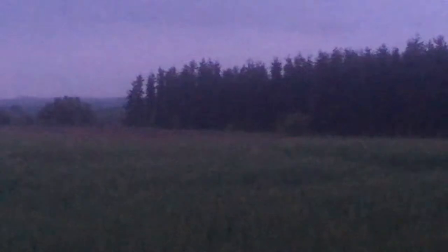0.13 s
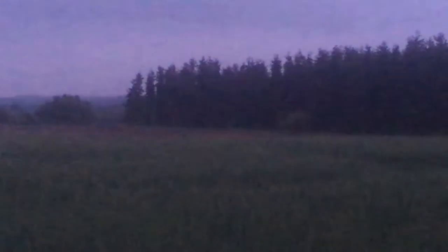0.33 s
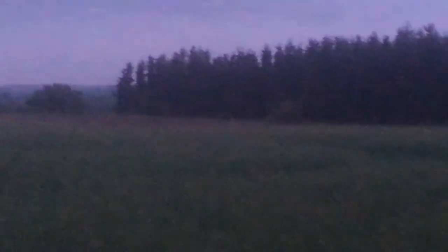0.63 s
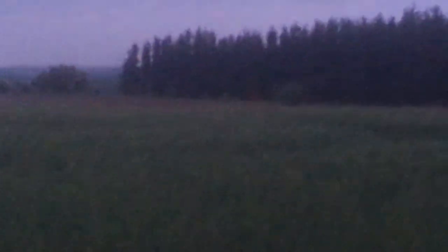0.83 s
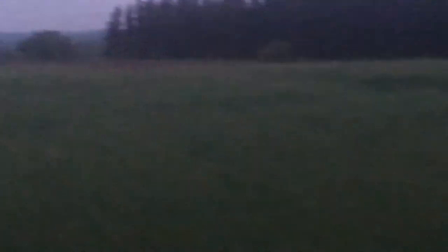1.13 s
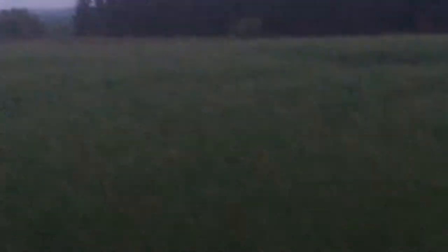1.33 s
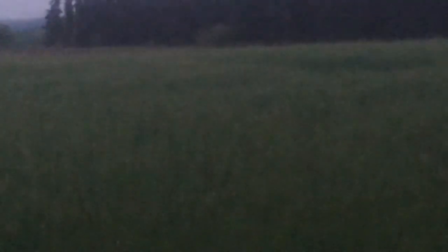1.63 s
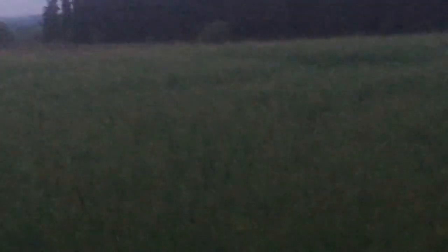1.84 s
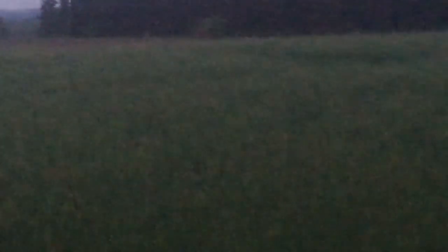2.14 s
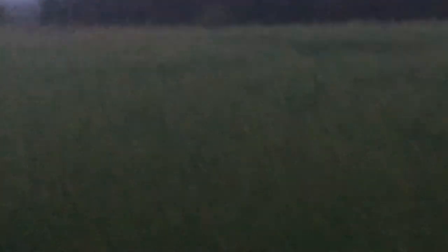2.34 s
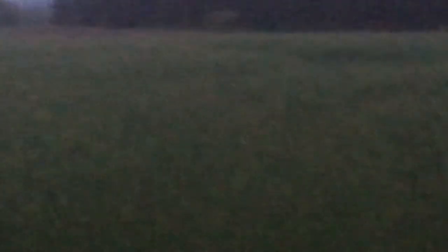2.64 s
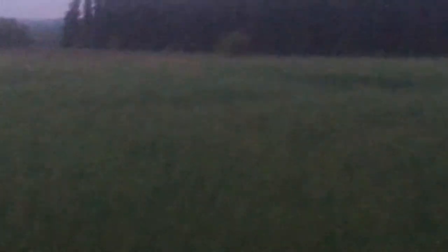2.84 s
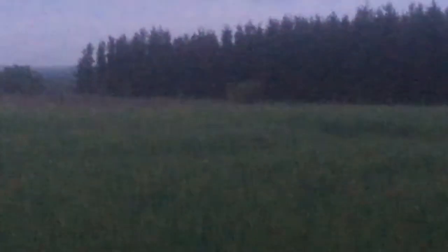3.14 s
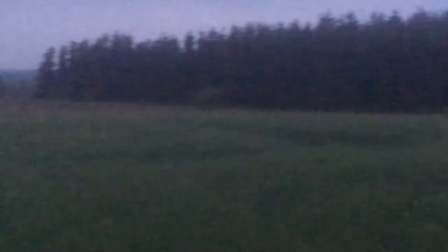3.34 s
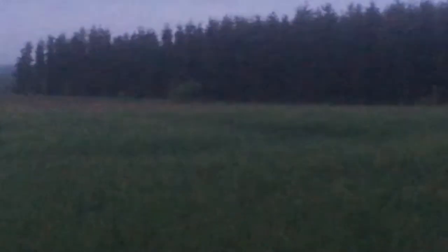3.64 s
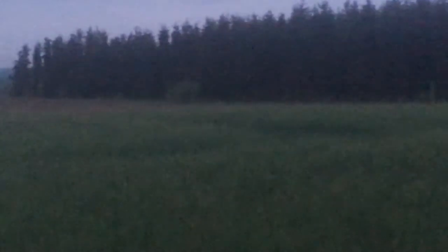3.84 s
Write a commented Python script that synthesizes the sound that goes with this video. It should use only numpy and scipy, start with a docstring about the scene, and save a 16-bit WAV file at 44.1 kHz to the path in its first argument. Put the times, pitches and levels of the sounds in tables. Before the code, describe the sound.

One rough, loud deer bark breaks a hushed field, echoing dully off the nearby wood.

```python
"""A meadow at dusk beside a wood: a roe deer barks once, harshly, and the wood returns a dull, late echo.
The sound opens on the very end of an earlier bark and its echo. Each bark is a source and filter: slaps
of the vocal folds and puffs of air drive moving throat resonances. Small birds far off are gliding sine
tones, most of them reverberant. Rumble and hiss are shaped noise; decaying or swelling noise makes the
faint ticks, bumps and rustles of the hand-held camera."""
import sys
import numpy as np
from scipy import signal
from scipy.fft import rfft, irfft
from scipy.io import wavfile
from scipy.ndimage import uniform_filter1d

SR = 44100
rng = np.random.default_rng(int(sys.argv[2]) if len(sys.argv) > 2 else 0)


def master_out(mix):
    """Clip the mix to full scale and print it as 16-bit PCM to the path in sys.argv[1]."""
    frames = np.transpose(np.atleast_2d(mix))
    ceiling = np.clip(frames, -1, 1)
    pcm = np.round(ceiling * 32767).astype(np.int16)
    wavfile.write(sys.argv[1], SR, pcm)


N = 176400

# Onsets of the barks: time [s]
BARK_ONSETS = [-0.284, 3.355]
# Course of one bark: (time from onset [s], level [dB], pitch [Hz], mouth resonance [Hz], chest tone level [dB])
BARK_COURSE = [(0, -61, 165.3, 1090, -61), (0.022, -45.5, 166.4, 1220, -55), (.04, -41, 171.3, 1348, -57.5),
               (.06, -40.5, 180.1, 1407, -53), (.085, -36, 184.6, 1380, -57),
               (0.108, -41.5, 184.1, 1498, -57), (0.178, -38, 185.1, 1510, -55.5),
               (0.229, -39, 184.6, 1467, -56), (.27, -40, 181.4, 1434, -57.5), (.292, -38, 179, 1208, -47),
               (.312, -44, 172.6, 1150, -65.5), (0.333, -52.5, 163.4, 960, -57),
               (.358, -50.5, 159.2, 1040, -57), (0.383, -63.5, 154.3, 970, -72),
               (0.403, -86, 148, 880, -83)]
# Broad colour of the voice, mouth open and mouth shut: (frequency [Hz], gain [dB])
OPEN_MOUTH_COLOUR = [(100, -38), (220, -16.5), (300, -1), (390, -8.5), (490, -8.5), (580, -23), (680, -4),
                     (1000, 1.5), (1300, 3), (1650, -0.5), (1900, -3.5), (2100, -7.5), (2450, -6),
                     (2850, -8.5), (3250, -14), (3600, -19.5), (4000, -29), (4450, -21), (5400, -35),
                     (6700, -27.5), (8200, -38.5), (11500, -30), (15000, -46)]
SHUT_MOUTH_COLOUR = [(100, -20), (230, -8.5), (420, 1.5), (570, -15.5), (800, -11), (1000, -2.5),
                     (1300, -11.5), (1720, 6.5), (1950, -12.5), (2400, -3), (2700, -21.5), (3600, -19),
                     (5000, -36), (15000, -50)]
# Throat resonances: (multiple of the mouth resonance [1], width [Hz], gain of the added resonance [dB])
THROAT_RESONANCES = [(0.532, 34.2, 9.5), (0.878, 46.6, 1), (1.002, 72, 13), (1.25, 71.6, -6.5),
                     (1.9, 150, -2)]
# Colour of the sound returned by the wood: (frequency [Hz], gain [dB])
WOOD_COLOUR = [(100, -16.5), (400, -6), (750, 5), (1100, 4), (1500, -1), (1800, -4), (2200, 4), (3000, -21),
               (6000, -31)]
# Slow swell of the rumble: (time [s], level [dB])
RUMBLE_SWELL = [(0, -61.5), (.7, -58), (1.4, -58), (2.0, -58), (2.4, -57.5), (2.55, -56), (2.95, -56.5),
                (3.3, -59.5), (4, -55)]
# Relative spectra of the rumble and the hiss: (frequency [Hz], level [dB])
RUMBLE_SPECTRUM = [(5, -62), (18, -42), (30, -15), (51, -1.5), (66, 2), (92, -4.5), (115, -8), (141, -14.5),
                   (248, -25), (398, -30), (650, -64)]
HISS_SPECTRUM = [(200, 3), (450, 9.5), (900, 7), (1500, 4), (2500, 3.5), (3700, -0.5), (4900, -4),
                 (6200, -0.5), (7600, -3.5), (9400, 0), (10400, -4.5), (11500, 1), (15700, 2)]
# Songbird at the edge of the wood, a second bird's low arched fluting, and a tit's level opening note:
# (onset [s], length [s], start pitch [Hz], middle pitch [Hz], end pitch [Hz], level [dB])
WHISTLE_NOTES = [(.14, .08, 2274, 2215, 2130, -76), (1.16, 0.097, 2440, 2524, 2370, -74.5),
                 (1.24, 0.063, 2380, 2316, 2270, -76.5), (1.53, 0.11, 1750, 1900, 2170, -80),
                 (1.63, .13, 2440, 2228, 2110, -74.5), (1.98, 0.056, 2480, 2250, 2150, -77),
                 (2.091, .13, 2200, 2070, 1940, -76.5), (2.19, 0.11, 1920, 1843, 1750, -74.5),
                 (2.39, 0.14, 2460, 2495, 2530, -76.5), (2.58, 0.091, 1850, 1803, 1660, -80.5)]
FLUTE_NOTES = [(1.95, 0.05, 1230, 1237, 1190, -76.5), (2.18, 0.083, 1334, 1396, 1190, -78),
               (2.35, 0.1, 1158, 1377, 1190, -75.5), (2.92, .13, 1162, 1284, 1150, -77.5),
               (3.11, 0.074, 1465, 1575, 1440, -77.5)]
TIT_OPENING_NOTE = (2.295, .08, 3800, 3760, 3770, -73)
# Two-part phrases of the tit: (time of the whistle's dip [s], whistle level [dB], buzz level [dB], buzz pitch [Hz])
TIT_PHRASES = [(2.558, -63, -80, 3670), (2.703, -63, -74, 3750), (2.846, -61, -71, 3650),
               (2.987, -61.5, -70.5, 3680), (3.134, -63, -67, 3706), (3.288, -62, -65.5, 3740)]
# Ticks of the camera body: (time [s], initial knock level [dB], initial click level [dB])
CASING_TICKS = [(.729, -59, -67), (.755, -46, -64), (2.852, -52.5, -70), (3.257, -62.5, -54)]
# Handling of the camera: (middle [s], standard deviation of the swell [s], bump level [dB], rustle level [dB])
HAND_MOVES = [(0.714, .06, -59.5, -89), (.87, 0.028, -58, -69), (0.964, 0.052, -73, -71.5),
              (1.553, 0.029, -64.5, -93), (1.864, 0.037, -56, -97), (2.343, 0.045, -64.5, -72),
              (2.63, 0.038, -71, -71), (2.866, 0.034, -62, -93)]
# Relative spectra of knock, click, bump and rustle: (frequency [Hz], level [dB])
KNOCK_SPECTRUM = [(100, 2), (400, -0.5), (800, -1), (1300, -7), (2500, -28), (8000, -41)]
CLICK_SPECTRUM = [(500, -26), (2000, -13.5), (5000, -4.5), (9000, -3), (11000, -10), (16000, -30)]
BUMP_SPECTRUM = [(30, -26), (90, 2), (180, 2), (260, -15), (500, -24.5), (2000, -50)]
RUSTLE_SPECTRUM = [(300, 8), (1200, 9.5), (3000, 1), (6500, 6), (9000, 3), (10500, 2), (12500, -4),
                   (16000, -11)]

# Vocal folds: rms pitch unevenness (share), strength unevenness per cycle (dB)
JITTER, SHIMMER_DB = 0.045, 1.6
# Puffs of air: decay constant (cycles), steady leak relative to the decaying part
PUFF_CYCLES, PUFF_FLOOR = 0.24, 0.13
# Share of the puffs in the drive, mouth open and shut; middle and length of the closing (s)
ROUGH_OPEN, ROUGH_SHUT = 0.78, 0.68
SHUT_S, SHUT_OVER_S = 0.322, 0.04
# Treble above TREBLE_HZ rises with the mouth resonance and is unchanged at WIDE_HZ
TREBLE_HZ, TREBLE_DB_PER_HZ, WIDE_HZ = 4040, 0.0224, 1490
SLAP_CEILING = 3.8  # soft limit, in multiples of the running rms
# Echo of the wood, timed from the bark's onset, and the long scatter
ECHO_DB, ECHO_START_S, ECHO_PEAK_S, ECHO_T60_S = -23, 0.34, 0.5, 2.35
SCATTER_DB, SCATTER_T60_S = -29.5, 8.6
HISS_DB = -69
# Reverberation, relative to the direct song: of the tit, then of the songbird's whistles
TIT_WET_DB, TIT_T60_S = -5, 0.55
WHISTLE_WET_DB, WHISTLE_T60_S = 3, 0.8
KNOCK_T60_S, CLICK_T60_S = 0.024, 0.0099
# Tit: base pitch of the dip, nominal bend above it, lengths, and lead of the buzz before the dip
TIT_DIP_HZ, TIT_BEND_HZ = 3026, 234
TIT_WHISTLE_S, TIT_BUZZ_S, TIT_LEAD_S = 0.043, 0.0528, 0.06
START_S, EDGE_HZ = 0.072, 15750  # opening of the recorder, and its treble limit


def amp(db):
    """Logarithmic level: converts decibels to an amplitude ratio."""
    return 10 ** (np.asarray(db) / 20)


def unit(x):
    """Normalisation: scales a signal to rms 1."""
    return x / np.sqrt(np.mean(x ** 2) + 1e-20)


def add(mix, s, sound):
    """Superposition: adds a sound to the mix from time s, clipped at both ends."""
    at = round(s * SR)
    part, sound = mix[max(at, 0):], sound[max(-at, 0):]
    part[:len(sound)] += sound[:len(part)]


def gain_curve(hz, points):
    """Spectral envelope: interpolates decibels over log frequency and returns amplitude gains."""
    f, db = np.transpose(points)
    return amp(np.interp(np.log(hz + 1), np.log(f), db))


def colour(x, points):
    """Minimum-phase filtering: the log gain and its Hilbert transform define a causal response."""
    hz = abs(np.fft.fftfreq(4096, 1 / SR))
    log_gain = np.log(gain_curve(hz, points))
    response = np.exp(np.conj(signal.hilbert(log_gain)))
    taps = np.fft.ifft(response).real
    return signal.fftconvolve(x, taps[:len(taps) // 2])[:len(x)]


def noise(points):
    """Spectral shaping: white noise takes the given spectrum, at rms 1."""
    hz = np.fft.rfftfreq(N, 1 / SR)
    spectrum = rfft(rng.standard_normal(N)) * gain_curve(hz, points)
    return unit(irfft(spectrum, N))


def wander(t, per_s):
    """Random modulation: straight lines join per_s random values a second, at rms 1."""
    knots = rng.standard_normal(2048)
    return unit(np.interp(t * per_s, np.arange(len(knots)), knots))


def resonate(x, hz, width):
    """Resonance: shifts the moving frequency hz to zero, low-passes there and shifts back."""
    turn = np.exp(2j * np.pi * np.cumsum(hz) / SR)
    r = np.exp(-np.pi * width / SR)
    smoothed = signal.lfilter([1 - r], [1, -r], x / turn)
    return 2 * (turn * smoothed).real


def reflect(x, envelope):
    """Diffuse reflection: convolution with noise of the given envelope, at unit energy."""
    taps = rng.standard_normal(len(envelope)) * envelope
    return signal.fftconvolve(x, taps / np.linalg.norm(taps))


def decay(t, t60):
    """Exponential decay: falls 60 dB in t60 seconds."""
    return np.exp(-np.log(1000) * t / t60)


def bark():
    """Source and filter: uneven slaps of the folds and puffs of air ring a throat that opens and closes."""
    t = np.arange(0, BARK_COURSE[-1][0], 1 / SR)
    times, *columns = np.transpose(BARK_COURSE)
    db, hz, mouth_hz, chest_db = (np.interp(t, times, c) for c in columns)

    turns = np.cumsum(hz * (1 + JITTER * wander(t, per_s=180))) / SR
    cycle, phase = turns.astype(int), turns % 1
    shimmer_db = SHIMMER_DB * np.clip(rng.standard_normal(256), -2, 2)
    strength = uniform_filter1d(amp(shimmer_db)[cycle], size=40)
    slaps = unit(np.diff(cycle, prepend=0) * 1.)  # one impulse per cycle
    puff_shape = PUFF_FLOOR + np.exp(-phase / PUFF_CYCLES)
    puffs = unit(puff_shape * rng.standard_normal(len(t)))

    shut = np.clip((t - SHUT_S) / SHUT_OVER_S + .5, 0, 1)
    rough = np.clip(ROUGH_OPEN + (ROUGH_SHUT - ROUGH_OPEN) * shut, 0, 1)
    drive = (1 - rough) * slaps + rough * puffs
    open_voice = unit(colour(drive, OPEN_MOUTH_COLOUR))
    shut_voice = unit(colour(drive, SHUT_MOUTH_COLOUR))
    voice = (1 - shut) * open_voice + shut * shut_voice
    for share, width, gain_db in THROAT_RESONANCES:
        voice = voice + amp(gain_db) * resonate(voice, share * mouth_hz, width)

    high_pass = signal.butter(3, TREBLE_HZ, "high", fs=SR, output="sos")
    treble = signal.sosfiltfilt(high_pass, voice)
    treble_gain = amp(TREBLE_DB_PER_HZ * (mouth_hz - WIDE_HZ))
    voice = voice + (treble_gain - 1) * treble

    # Even out the running level, then soften the hardest slaps
    voice /= np.sqrt(uniform_filter1d(voice ** 2, size=480) + 1e-12)
    force = uniform_filter1d(abs(signal.hilbert(voice)), size=50) * strength
    voice = unit(voice * strength / np.hypot(1, force / SLAP_CEILING))
    chest_tone = unit(np.sin(2 * np.pi * turns))
    return amp(db) * voice + amp(chest_db) * chest_tone


def deer():
    """Delayed reflection: each direct bark is joined by a swelling echo of the wood and long faint scatter."""
    out, t = np.zeros(N), np.arange(2 * SR) / SR
    swell = np.clip((t - ECHO_START_S) / (ECHO_PEAK_S - ECHO_START_S), 0, 1) ** 2
    wood = swell * decay(np.maximum(t - ECHO_PEAK_S, 0), ECHO_T60_S)
    for start in BARK_ONSETS:
        call = bark()
        far = colour(call, WOOD_COLOUR)
        echo = amp(ECHO_DB) * reflect(far, wood)
        scatter = amp(SCATTER_DB) * reflect(far, decay(t, SCATTER_T60_S))
        add(out, start, call)
        add(out, start, echo + scatter)
    return out


def background():
    """Stationary noise: even hiss lies over a low rumble whose level swells slowly."""
    level_db = np.interp(np.arange(N) / SR, *np.transpose(RUMBLE_SWELL))
    return amp(level_db) * noise(RUMBLE_SPECTRUM) + amp(HISS_DB) * noise(HISS_SPECTRUM)


def note(hz, db):
    """Frequency modulation: a sine follows the pitch curve hz as it swells and fades."""
    swell = np.sqrt(np.sin(np.linspace(0, np.pi, len(hz))) + 1e-12)
    tone = np.sin(2 * np.pi * np.cumsum(hz) / SR)
    return amp(db) * unit(swell * tone)


def song(notes):
    """Pitch glide: each note follows a parabola through three pitches, with a slight random waver."""
    out = np.zeros(N)
    for s, length, first_hz, middle_hz, last_hz, db in notes:
        t = np.arange(0, length, 1 / SR)
        parabola = np.polyfit([0, .5, 1], [first_hz, middle_hz, last_hz], 2)
        arch = np.polyval(parabola, t / length)
        add(out, s, note(arch * (1 + 0.01 * wander(t, per_s=134.6)), db))
    return out


def birds():
    """Reverberation: trees blur the tit and, more strongly, the whistles; the fluting stays direct."""
    t = np.arange(SR) / SR
    near = tit() + song([TIT_OPENING_NOTE])
    near = near + amp(TIT_WET_DB) * reflect(near, decay(t, TIT_T60_S))[:N]
    far = song(WHISTLE_NOTES)
    far = far + amp(WHISTLE_WET_DB) * reflect(far, decay(t, WHISTLE_T60_S))[:N]
    far = far / np.hypot(1, amp(WHISTLE_WET_DB))  # offsets the energy of the reverberation
    return near + far + song(FLUTE_NOTES)


def camera():
    """Impact and friction: decaying noise for ticks of the casing, swelling noise for bumps and rustles."""
    out, t = np.zeros(N), np.arange(N) / SR
    for s, knock_db, click_db in CASING_TICKS:
        knock = amp(knock_db) * noise(KNOCK_SPECTRUM) * decay(t, KNOCK_T60_S)
        click = amp(click_db) * noise(CLICK_SPECTRUM) * decay(t, CLICK_T60_S)
        add(out, s, knock + click)
    bump = noise(BUMP_SPECTRUM)
    rustle = noise(RUSTLE_SPECTRUM) * amp(2.3 * wander(t, per_s=140))  # uneven by 2.3 dB rms
    for s, spread, bump_db, rustle_db in HAND_MOVES:
        swell = np.exp(-.5 * ((t - s) / spread) ** 2)
        out += swell * (amp(bump_db) * bump + amp(rustle_db) * rustle)
    return out


def tit():
    """Rapid frequency modulation: a harsh high buzz drops into a whistle that dips and rises again."""
    out = np.zeros(N)
    t, u = np.arange(0, TIT_BUZZ_S, 1 / SR), np.arange(0, TIT_WHISTLE_S, 1 / SR)
    dip_s = TIT_WHISTLE_S * .4
    for s, whistle_db, buzz_db, buzz_hz in TIT_PHRASES:
        bend = np.tanh(abs(u - dip_s) / 0.0154) * rng.uniform(0.62, 1.32)
        whistle_hz = TIT_DIP_HZ + TIT_BEND_HZ * bend + 20 * wander(u, per_s=216)
        add(out, s - dip_s, note(whistle_hz, whistle_db))
        arch = .94 + 0.074 * np.sin(np.pi * t / TIT_BUZZ_S)
        flutter = 0.034 * wander(t, per_s=550)  # makes the tone harsh
        add(out, s - TIT_LEAD_S, note(buzz_hz * (arch + flutter), buzz_db))
    return out


def scene():
    """Linear superposition: all sources sum to one channel."""
    return (deer() + background() + birds() + camera())[None]


def record(dry):
    """Band limitation: the recorder opens a moment late and cuts the top treble."""
    live = dry * (np.arange(N) >= START_S * SR)
    low_pass = signal.firwin(511, EDGE_HZ, window=("kaiser", 9), fs=SR)
    return signal.oaconvolve(live, low_pass[None], "same")


dry = scene()
out = record(dry)
master_out(out)
```